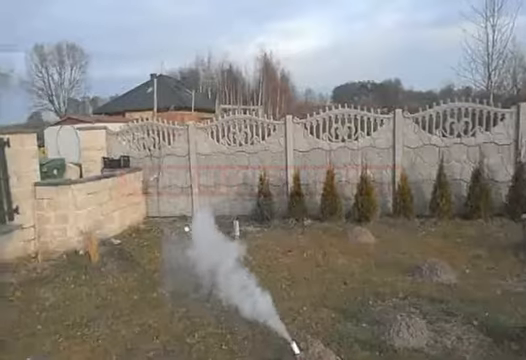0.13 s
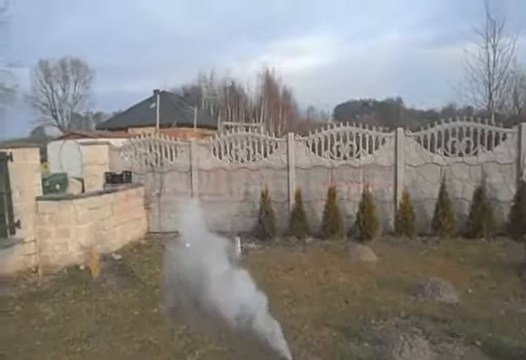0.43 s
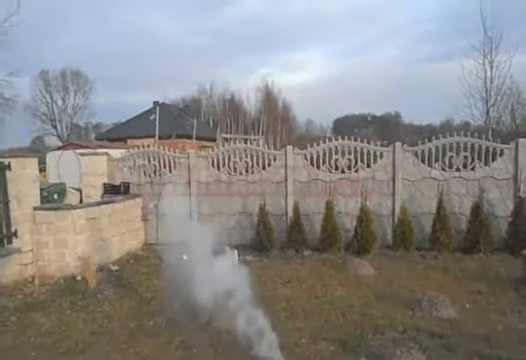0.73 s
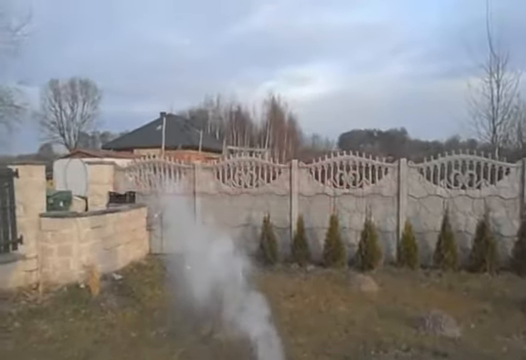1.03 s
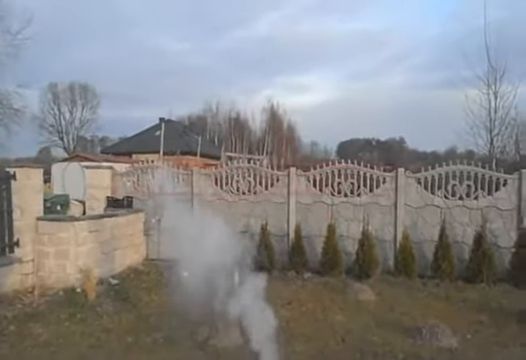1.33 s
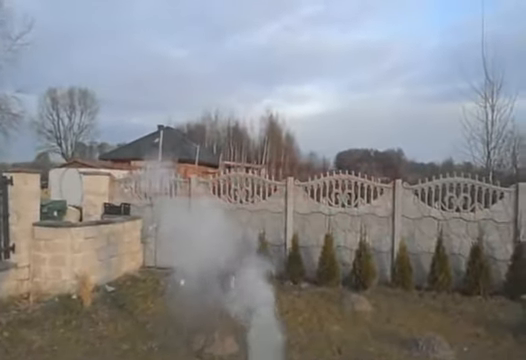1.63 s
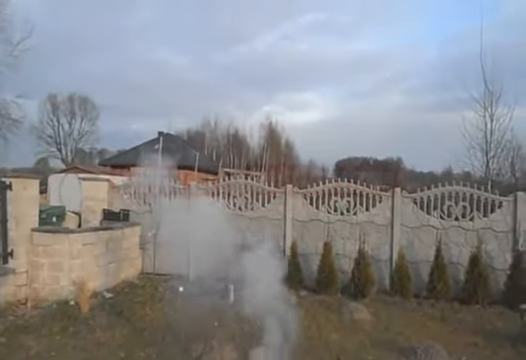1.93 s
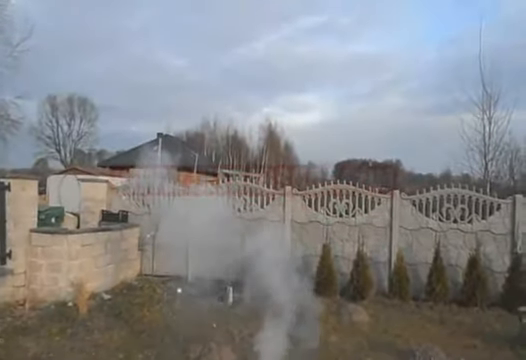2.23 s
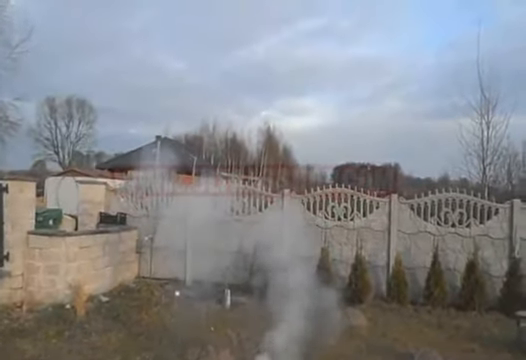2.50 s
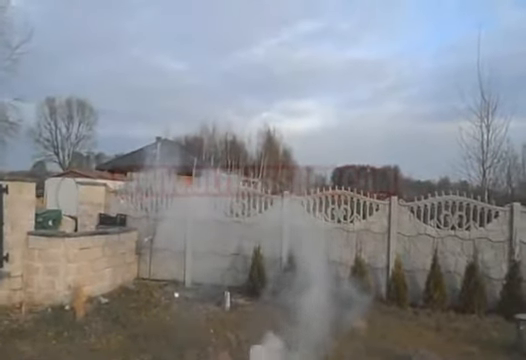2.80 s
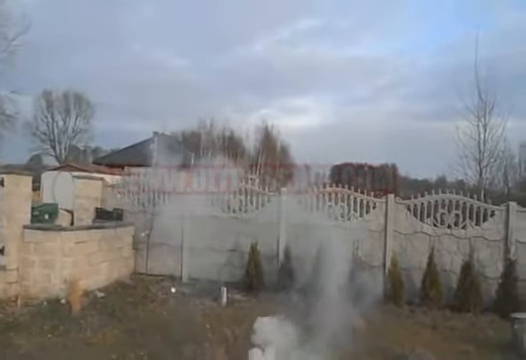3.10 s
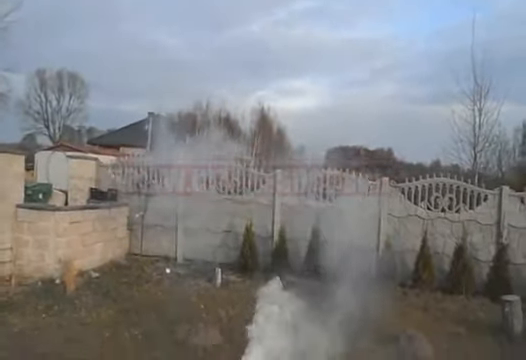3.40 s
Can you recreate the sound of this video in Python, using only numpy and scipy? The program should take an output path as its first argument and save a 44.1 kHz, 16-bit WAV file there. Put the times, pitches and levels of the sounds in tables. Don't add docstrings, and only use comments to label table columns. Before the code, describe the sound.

Pressurized smoke hisses from a burning tube on a lawn, sputtering finely, then dropping to a thin, weak hiss; soft low camera bumps, slight wall and fence echoes, boxy single-microphone sound.

```python
import sys
import numpy as np
from scipy import signal
from scipy.io import wavfile
from scipy.ndimage import map_coordinates

SR = 44100
rng = np.random.default_rng(int(sys.argv[2]) if len(sys.argv) > 2 else 0)


def dump_mix(stems):
    frames = np.atleast_2d(stems).T
    limited = np.clip(frames, -1, 1)
    pcm = np.round(limited * 32767).astype(np.int16)
    wavfile.write(sys.argv[1], SR, pcm)


def level_to_linear(level):
    exponent = np.asarray(level, float) / 20
    return 10 ** exponent


N = 156555

# pitch_hz, level_db (per Hz)
YARD_COLOR = [(20, -5.5), (50, 0.5), (100, -11.5), (300, -15.5), (800, -18), (2000, -25)]
# start_s, peak_db, pitch_hz
HAND_BUMPS = [
    (0.812, -24.5, 44.9),
    (0.877, -27.5, 90.7),
    (.974, -29.5, 64.9),
    (2.381, -24.5, 150),
    (2.789, -25.5, 85),
]
# pitch_hz, width_hz, level_db
HOUSING_RINGS = [(1158, 610, 11), (1584, 260, -20), (1900, 103, -14), (2340, 380, -9), (2798, 220, 6.5),
                 (3250, 200, -2), (3950, 260, 2.5), (4470, 370, -11), (4796, 320, -11), (5550, 410, 1.5),
                 (6126, 410, 5), (7150, 720, 3.5), (8000, 820, -7.5),
                 (12480, 800, -11), (11800, 1100, -2.5), (15400, 1300, -6), (10400, 500, 2),
                  (8700, 900, -2)]
# delay_s, level_db
ECHO_PATHS = [(.0030, -25.5), (.0059, -19.5), (.00685, -20), (.0075, -22), (0.012, -14), (0.0228, -15),
              (0.0265, -22.5), (.0291, -12.5), (0.0305, -16), (0.034, -17.5), (.0410, -20), (.0540, -20.5)]
# time_s, roar_db, throb_db (relative to the roar)
BURN_STRENGTH = [(0.13, -33, -2.5), (0.22, -32.5, -3.5), (0.96, -33.5, -5), (1.19, -31, -2),
                 (1.59, -31, -3), (1.61, -30, -10), (1.64, -30.5, -3.5), (1.81, -30, -1.5),
                 (1.85, -30.5, -6), (2.36, -34, -3.5), (2.39, -28.5, -1.5), (2.43, -37.5, 1),
                 (2.5, -39, -1), (2.51, -32.5, -8), (2.56, -38.5, -5), (2.6, -36.5, -11.5),
                 (2.76, -39.5, -8), (3.55, -45, -7)]
# pitch_hz, level_db (per Hz)
THROB_COLOR = [(70, -9), (130, -3), (220, 0), (330, -8), (550, -20.5)]
# pitch_hz, level_db (per Hz)
ROAR_COLOR = [(400, -9.5), (550, -13), (900, -0.5), (1300, -2), (1800, -2), (2400, -21.5)]
# time_s, hiss_db
GAS_FLOW = [(0.13, -21), (0.43, -21.5), (0.46, -23), (0.48, -21.5), (0.68, -22.5), (0.73, -22),
            (1.08, -24.5), (1.22, -23), (2.16, -27.5), (2.29, -27.5), (2.35, -29.5), (2.41, -28),
            (2.46, -34), (2.48, -28.5), (2.85, -35.5), (3.22, -35), (3.39, -38.5), (3.55, -34.5)]
# pitch_hz, level_db (per Hz)
JET_COLOR = [(1500, -9.5), (3000, -14.5), (6000, -2.5), (8200, -8), (10300, -11), (12000, -23),
             (14200, -28), (16000, -21)]
# middle_s, low_hz, high_hz, level_db
SIDE_NOISES = [
    (.465, 6380, 8300, -29),
    (.465, 9700, 11400, -38),
    (3.53, 4200, 5150, -50),
    (3.53, 10400, 11800, -53),
]


def rms_one(x):
    return x / np.sqrt(np.mean(x ** 2) + 1e-20)


def in_time(rows):
    s, *columns = np.transpose(rows)
    return [np.interp(np.arange(N) / SR, s, column) for column in columns]


def drift(rate_hz):
    r = np.exp(-20 * np.pi * rate_hz / SR)
    warm_up = 4000
    noise = rng.standard_normal(N // 10 + warm_up + 2)
    slow = signal.lfilter([1], [1, -2 * r, r * r], noise)[warm_up:]
    return np.interp(np.arange(N) / 10, np.arange(len(slow)), rms_one(slow - slow.mean()))


def band_noise(noise, order, low_hz, high_hz):
    return signal.sosfilt(signal.butter(order, [low_hz, high_hz], "band", fs=SR, output="sos"), noise)


def turbulence(color, shared_db, own_db, own_rate_hz):
    hz, db = np.transpose(color)
    edges = 15 * 2 ** np.arange(0, 10.4, 1 / 3)
    warm_up = 8000
    white = rng.standard_normal((2, N + warm_up))
    out = 0
    for k, (low, high) in enumerate(zip(edges, edges[1:])):
        mid = np.sqrt(low * high)
        if hz[0] * 0.8 < mid < hz[-1] * 1.2:
            band = band_noise(white[k % 2], 2, low, high)[warm_up:]
            band_db = np.interp(np.log(mid), np.log(hz), db)
            out = out + band * level_to_linear(band_db + shared_db + own_db * drift(own_rate_hz))
    return rms_one(out)


def yard_rumble():
    return level_to_linear(-41.5) * turbulence(YARD_COLOR, 0.66 * drift(3.8), own_db=0.7, own_rate_hz=4)


def hand_bumps():
    length_cycles, trim_db = 1.2, -0.8
    t, out = np.arange(N) / SR, 0
    for s, db, hz in HAND_BUMPS:
        cycles = np.maximum(t - s, 0) * hz
        out = out - level_to_linear(db + trim_db) * np.sin(2 * np.pi * cycles) * np.exp(-(cycles / length_cycles) ** 4)
    return out


def housing(x):
    for hz, width_hz, db in HOUSING_RINGS:
        a, w = level_to_linear(db / 2), 2 * np.pi * hz / SR
        q = np.sin(w) * width_hz / hz / 2
        turn = -2 * np.cos(w)
        x = signal.lfilter([1 + q * a, turn, 1 - q * a], [1 + q / a, turn, 1 - q / a], x)
    return x


def yard_echoes(x, wet_db):
    treble_cut_hz, treble_db = 3600, -4.5
    sway_s, sway_hz = 4e-5, 0.6
    low = signal.sosfilt(signal.butter(2, treble_cut_hz, fs=SR, output="sos"), x)
    dull = low + level_to_linear(treble_db) * (x - low)
    out = x
    for s, db in ECHO_PATHS:
        delay_s = s + sway_s * drift(sway_hz)
        echo = map_coordinates(dull, [np.arange(N) - delay_s * SR], order=3, mode="wrap")
        out = out + level_to_linear(db + wet_db) * echo
    return rms_one(out)


def flame_throb(sputter_db):
    return turbulence(THROB_COLOR, 0.83 * sputter_db + 0.51 * drift(8.3), own_db=1.83, own_rate_hz=12.4)


def tube_roar(sputter_db):
    gas = turbulence(ROAR_COLOR, 0.99 * sputter_db + 0.89 * drift(45), own_db=0.24, own_rate_hz=15)
    return yard_echoes(housing(gas), wet_db=-9.5)


def gas_jet(sputter_db, flow_db, roar_db):
    sparkle_db, sparkle_fade_s = 0.5, 0.13
    body_hz, body_follows = 4200, 0.65
    jet = turbulence(JET_COLOR, sputter_db, own_db=0.2, own_rate_hz=17)
    sparkle_band = signal.butter(2, [9600, 11000], "band", fs=SR, output="sos")
    sparkle = signal.sosfiltfilt(sparkle_band, jet)
    fade = np.exp(-np.arange(N) / SR / sparkle_fade_s)
    jet = yard_echoes(housing(jet + level_to_linear(sparkle_db) * fade * sparkle), wet_db=0.4)
    body = signal.sosfiltfilt(signal.butter(4, body_hz, fs=SR, output="sos"), jet)
    lead_db = roar_db - flow_db
    return jet + body * (level_to_linear(body_follows * (lead_db - lead_db.mean())) - 1)


def canister():
    (flow_db,), (roar_db, throb_db) = in_time(GAS_FLOW), in_time(BURN_STRENGTH)
    sputter_db = drift(16.4) * 0.47 + drift(135) * 1.07
    throb = level_to_linear(roar_db + throb_db + 0.24) * flame_throb(sputter_db)
    roar = level_to_linear(roar_db - 1.64) * tube_roar(sputter_db)
    jet = level_to_linear(flow_db + 1) * gas_jet(sputter_db, flow_db, roar_db)
    return throb + roar + jet


def scene():
    return np.tile(yard_rumble() + hand_bumps() + canister(), (2, 1))


def side_noise():
    length_s = 0.036
    t, side = np.arange(N) / SR, 0
    for s, low_hz, high_hz, db in SIDE_NOISES:
        noise = rms_one(band_noise(rng.standard_normal(N), 8, low_hz, high_hz))
        side = side + level_to_linear(db) * noise * np.cos(np.pi * np.clip((t - s) / length_s, -0.5, 0.5))
    return side * [[1], [-1]]


def band_limit(x):
    return signal.sosfilt(signal.butter(12, 15730, fs=SR, output="sos"), x)


def record(dry):
    start_s, offset = 0.1208, -0.0026
    started = np.arange(N) / SR > start_s
    mix = (dry + offset + side_noise()) * started
    return band_limit(mix)


dry = scene()
out = record(dry)
dump_mix(out)
```